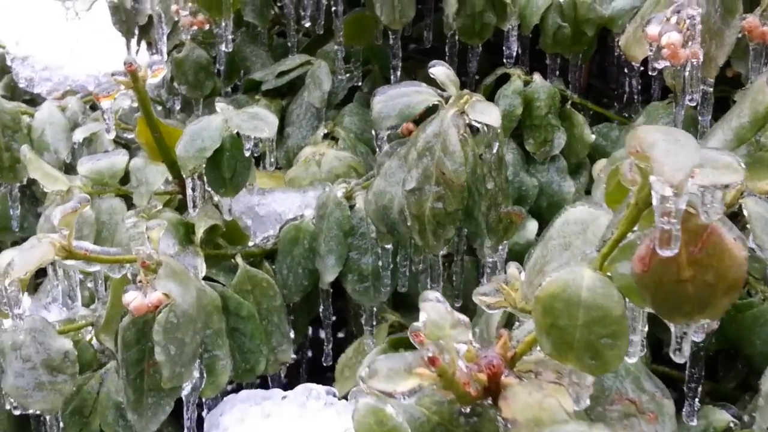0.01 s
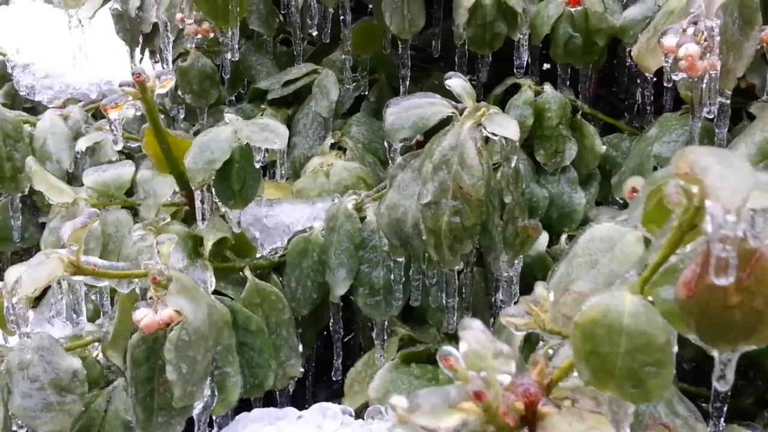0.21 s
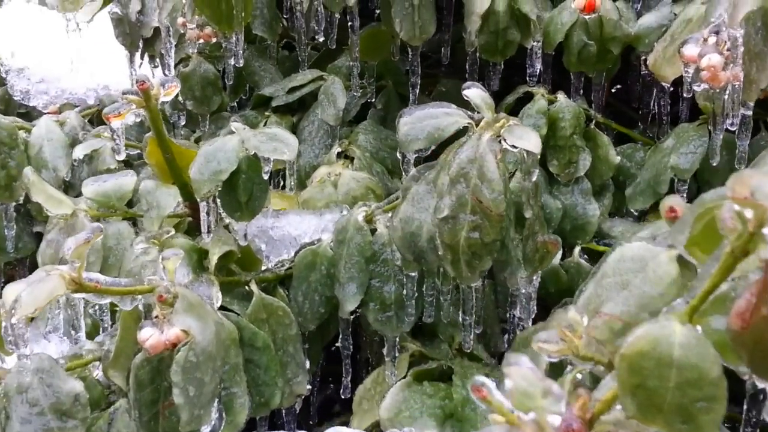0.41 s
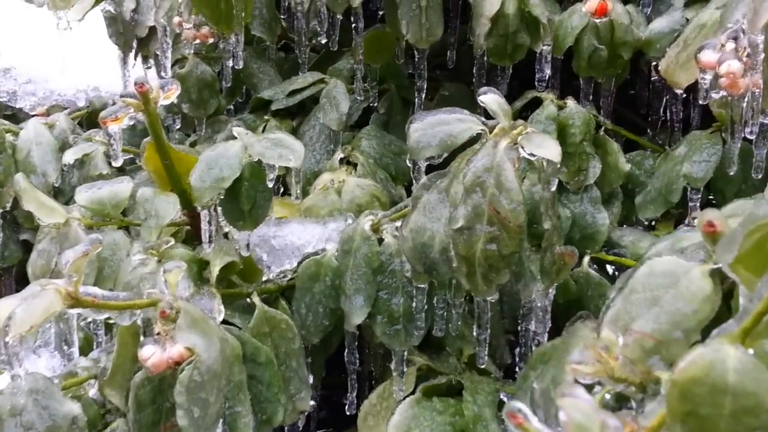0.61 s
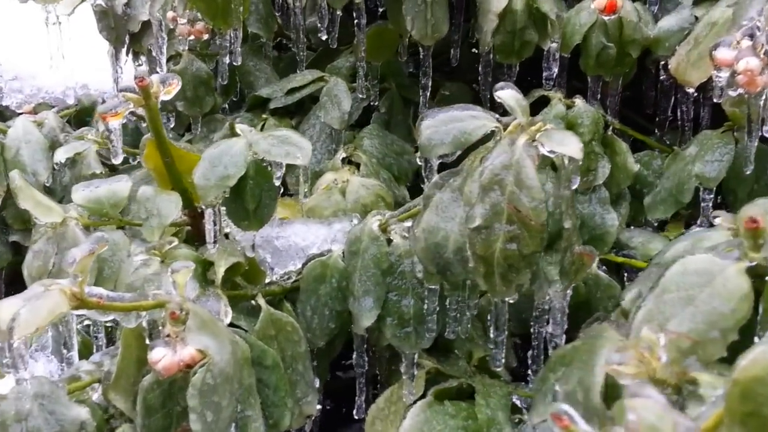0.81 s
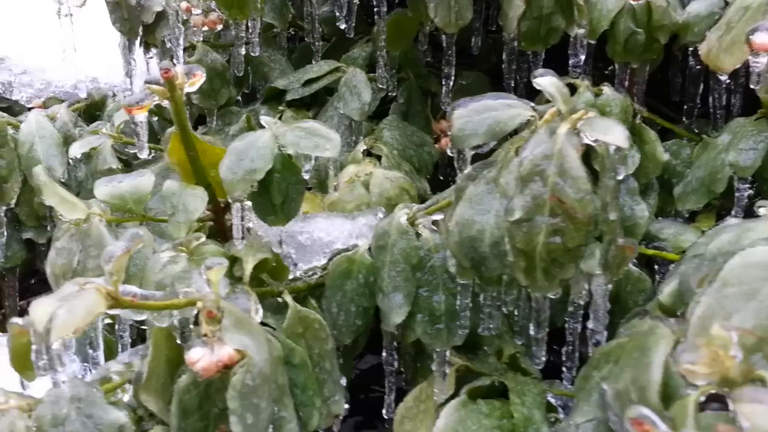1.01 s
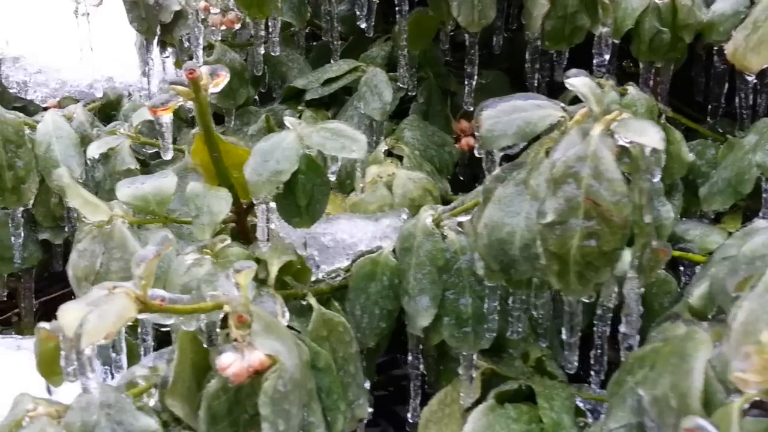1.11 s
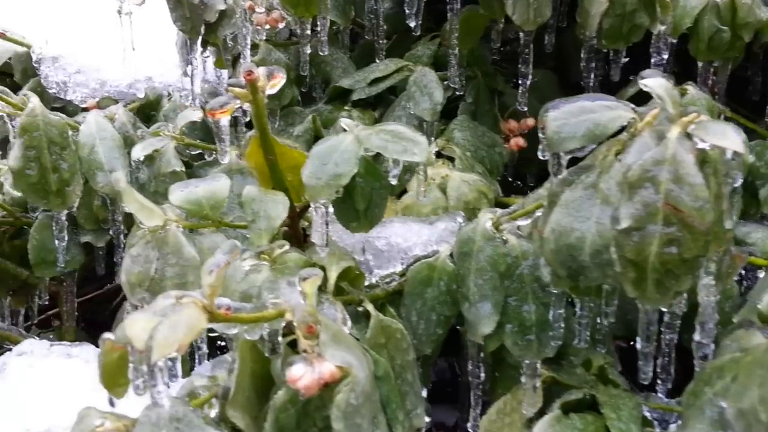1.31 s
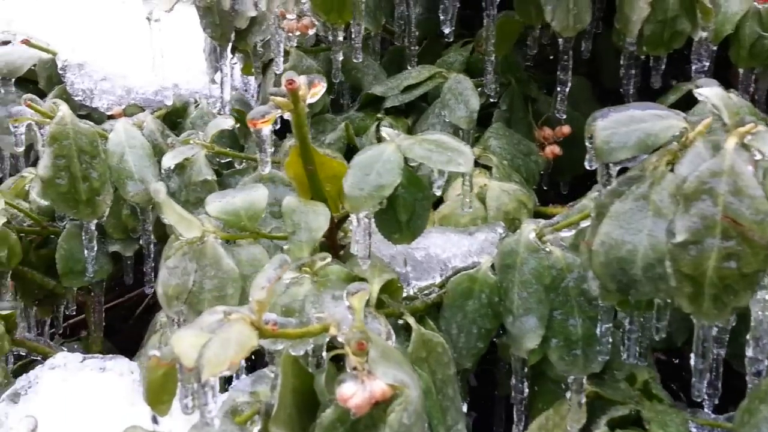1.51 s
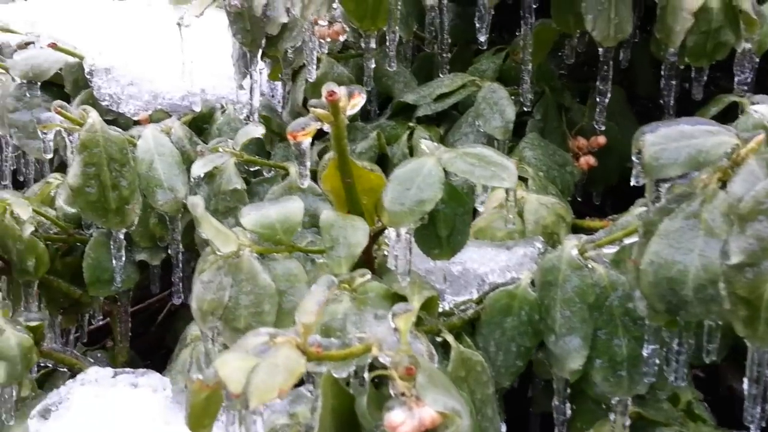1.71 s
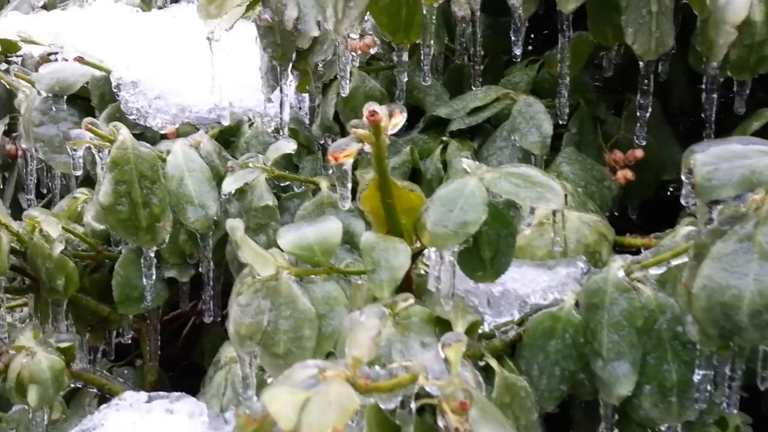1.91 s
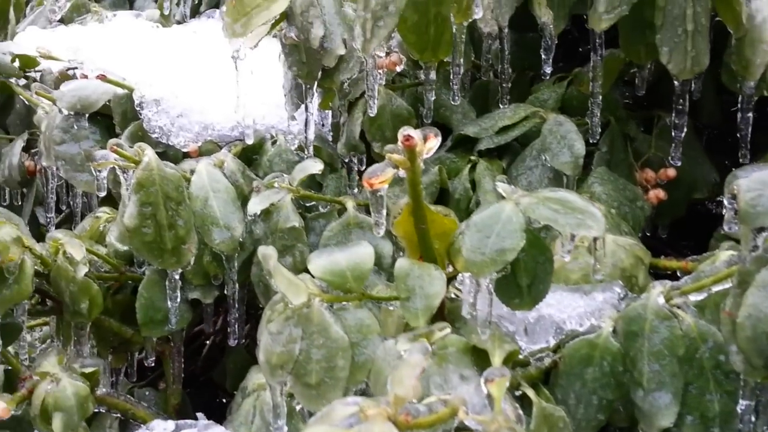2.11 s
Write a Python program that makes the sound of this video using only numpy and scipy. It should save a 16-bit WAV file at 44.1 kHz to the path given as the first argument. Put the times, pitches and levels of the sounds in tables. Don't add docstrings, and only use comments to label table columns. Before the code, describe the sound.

Brittle ice snaps and crumbles with hard dry knocks in the first second, chips patter through iced leaves, another crackling break follows, then faint hiss and low outdoor rumble; close stereo phone microphone, no echo.

```python
import sys
import numpy as np
from scipy import signal
from scipy.fft import rfft, irfft, next_fast_len
from scipy.io import wavfile
from scipy.ndimage import map_coordinates

SR = 44100
rng = np.random.default_rng(int(sys.argv[2]) if len(sys.argv) > 2 else 0)


def generate_wav(sig):
    pcm = np.round(np.clip(np.atleast_2d(sig).T, -1, 1) * 32767).astype(np.int16)
    wavfile.write(sys.argv[1], SR, pcm)


def volts_from_db(level):
    exponent = np.asarray(level, float) / 20
    return 10 ** exponent


N = 97020

PORT_LAG_S = 0.00011
# frequency in Hz, gain in dB.
NEAR_ICE = [(150, -45), (400, -8), (900, -7.5), (2500, -2.5), (5000, -4), (9000, -0.5), (15000, -13)]
# frequency in Hz, gain in dB.
FAR_ICE = [(300, 8.5), (1000, -4), (2500, -2.5), (5000, 0), (9000, -1), (15000, -7.5)]


def unit(x):
    return x / np.sqrt(np.mean(x ** 2) + 1e-20)


def wobble(rate):
    knots = rng.standard_normal(N // 8)
    return map_coordinates(knots, [np.arange(N) * rate / SR])


def coloured(x, points):
    size = 2 * next_fast_len(N // 2 + SR // 8)
    hz, db = np.transpose(points)
    log_hz = np.log(np.fft.rfftfreq(size, 1 / SR) + 1)
    cepstrum = irfft(np.log(volts_from_db(np.interp(log_hz, np.log(hz + 1), db))), size)
    cepstrum[1:size // 2] *= 2
    cepstrum[size // 2 + 1:] = 0
    return irfft(rfft(x, size) * np.exp(rfft(cepstrum)), size)[..., :N]


def ring(x, hz, width_hz):
    f = np.fft.rfftfreq(x.shape[-1], 1 / SR)
    damping = 1j * f * width_hz
    return irfft(rfft(x) * damping / (hz * hz - f * f + damping), x.shape[-1])


def pair(shared, apart=((100, 0), (200, 0))):
    common, left, right = rng.standard_normal((3, N))
    share = np.clip(shared, 0, 1)
    mid = (left + right) / 2
    side = coloured((left - right) / 2, apart)
    late = np.roll(common, round(PORT_LAG_S * SR))
    own = np.array([mid + side, mid - side])
    return np.sqrt(share) * np.array([late, common]) + np.sqrt(1 - share) * own


def gritty(grit_db):
    # frequency in Hz, gain of the
    # difference in dB.
    port_difference = [(700, -2), (2500, 2.5)]
    grains = volts_from_db(grit_db * wobble(760))
    return unit(pair(0.22, port_difference) * grains)


def fractures(rows, colour, shard_db, t60):
    rise_s, scatter_t60_s, shard_q = 0.0015, 0.12, 7
    out = np.zeros((2, N + SR))
    grit = np.tile(gritty(1.25), 2)
    t = np.arange(SR // 5) / SR
    decay = volts_from_db(-60 * t / t60)
    for start, db, scatter_db, hz in rows:
        at = round(start * SR)
        noise = grit[:, at:at + len(t)] * (1 - np.exp(-t / rise_s))
        crack = noise * decay
        crack *= np.linalg.norm(decay) / np.linalg.norm(crack, axis=1, keepdims=True)
        shard = ring(crack[0], hz, hz / shard_q)
        shard *= np.linalg.norm(crack[0]) / np.linalg.norm(shard) / 2
        scatter = noise * volts_from_db(scatter_db - 60 * t / scatter_t60_s)
        ringing = shard + ring(scatter, hz, hz / shard_q)
        out[:, at:at + len(t)] += volts_from_db(db) * (crack + scatter + volts_from_db(shard_db) * ringing)
    return coloured(out[:, :N], colour)


def clean_snaps():
    # start in seconds, crack in dB, scatter after it in dB, shard pitch in Hz.
    breaks = [(.2042, -27, -3, 3530), (.2065, -21, -16, 7500), (.2265, -11.5, -12, 7950),
              (.3275, -13, -21, 2470), (.330, -22, -5.5, 6900), (.3808, -40, -28, 7000),
              (.3933, -12, -8, 2960), (.405, -29, -27, 8000), (.4321, -19, -13, 6000),
              (.4735, -23, -25, 1900), (.5925, -20, -4.5, 4360), (.670, -15, -6, 6900),
              (.6765, -11.5, -7, 4860), (1.3272, -18, 0.5, 6000), (1.3415, -9, -9.5, 6200),
              (1.4895, -24, -12, 5450), (.4948, -15.5, -0.5, 5400), (.5145, -8.5, -15, 4400),
              (.520, -8.5, -24, 2540)]
    return fractures(breaks, NEAR_ICE, shard_db=1, t60=0.0074)


def crumbles():
    # start in seconds, rise in seconds, hold in seconds, level in dB, fade t60 in seconds.
    collapses = [(0.316, 0.0039, .001, -32, 0.017), (0.224, 0.0036, .001, -24, .02),
                 (0.474, 0.0035, 0.0092, -30.5, 0.059), (0.4931, 0.0015, 0.02, -10, 0.081),
                 (0.535, .005, 0.013, -25, 0.17), (0.59, .004, 0.009, -41, 0.059),
                 (0.645, 0.0026, 0.0096, -27.5, 0.13), (0.674, 0.002, 0.0083, -15, 0.062),
                 (0.968, 0.0054, 0.015, -37.5, 0.47), (1.334, 0.0019, 0.033, -14.5, 0.11),
                 (1.44, 0.019, 0.027, -24, 0.072), (1.617, 0.0043, 0.032, -44, 0.099),
                 (1.85, 0.0041, 0.018, -46.5, 0.073), (1.913, 0.01, 0.018, -50, 0.067),
                 (2.021, 0.0029, 0.019, -43, 0.092)]
    t = np.arange(N) / SR
    power = np.zeros(N)
    for start, rise, hold, db, t60 in collapses:
        attack = np.clip((t - start) / rise, 0, 1)
        fading_s = np.maximum(t - start - rise - hold, 0)
        power += (attack * volts_from_db(db - 60 * fading_s / t60)) ** 2
    return coloured(np.sqrt(power) * gritty(2.5), NEAR_ICE)


def splinters():
    # start in seconds, crack in dB, shard pitch in Hz.
    breaks = [(.4955, -20, 6200), (0.5, -20, 6800), (0.503, -19, 7000), (0.508, -32, 6000),
              (0.5112, -24, 8200), (0.511, -18.5, 7060), (0.523, -22, 6500), (0.526, -23, 4950),
              (0.535, -27, 6000), (0.6785, -23, 7000), (0.684, -21, 6500), (0.685, -27, 8600),
              (0.3992, -25, 4450), (0.397, -29, 7000), (.412, -30, 4200), (0.4331, -28, 2720),
              (0.329, -37, 2950), (1.3406, -20, 9500), (1.347, -28, 7500), (1.348, -19, 5300),
              (1.3495, -22, 7660), (1.3515, -12, 5230), (1.3673, -19, 6300), (1.376, -21, 7200),
              (1.384, -26, 6960), (1.4595, -31, 6800), (1.464, -23, 5230), (1.4725, -25, 5240),
              (1.476, -17, 6800), (1.4896, -17, 5500)]
    rows = [(start, db, -40, hz) for start, db, hz in breaks]
    return fractures(rows, NEAR_ICE, shard_db=8, t60=0.0041)


def twigs():
    # start in seconds, peak in dB, pitch in Hz, t60 in seconds.
    knocks = [(0.2044, -37, 1640, 0.015), (.2268, -21.5, 1494, 0.014), (.2272, -9, 344, 0.004),
              (0.3275, -10.5, 1530, 0.01), (.328, -2, 500, 0.0036), (0.3932, 0.5, 442, 0.0066),
              (0.3956, -4.5, 167, 0.014), (.3935, -10.5, 680, .006), (0.4335, -13, 660, 0.0083),
              (0.4318, -16, 1010, 0.0087), (0.4959, -24, 212, 0.089), (1.485, -29.5, 787, 0.025),
              (1.343, -27, 196, 0.051), (1.462, -23.5, 259, 0.022), (1.617, -30.5, 173, 0.015),
              (.4735, -20, 580, 0.0059), (.5475, -25.5, 690, 0.013), (.5545, -25, 855, 0.0098),
              (.598, -39.5, 700, 0.04), (.6482, -31, 676, 0.018), (.6555, -17.5, 840, 0.0037),
              (1.151, -41, 1450, 0.0074), (1.2012, -27.5, 720, 0.0098), (1.770, -38, 234, 0.027),
              (.55, -30, 100, 0.078), (1.36, -29, 115, 0.079), (1.772, -37, 95, 0.088),
              (2.155, -32.5, 142, 0.03)]
    # start in seconds, peak in dB, pitch in Hz.
    rattles = [(0.3922, -15, 1660), (.4956, -21, 890), (.4968, -11, 680), (0.5006, -8.5, 1280),
               (0.5018, -10, 875), (0.5041, -7, 800), (0.5058, -18.5, 780), (0.506, -18, 384),
               (0.5075, -11, 756), (0.5089, -13, 854), (.511, -12, 1160), (.5122, -16.5, 590),
               (0.5134, -7, 2470), (.5142, -8, 826), (.516, -38, 860), (0.5197, -15.5, 825),
               (.5245, -29, 1510), (.670, -15.5, 780), (0.6763, -13, 805), (.678, -16, 785),
               (0.6813, -13.5, 864), (0.6813, -14, 2820), (.677, -15, 2800), (0.6861, -22.5, 670),
               (0.6877, -8, 2800), (.689, -41, 920), (1.3273, -23, 930), (1.3275, -12, 1600),
               (1.3377, -13.5, 830), (1.3273, -12.5, 2880), (1.342, -25, 544), (1.346, -17, 680),
               (1.349, -22, 557), (1.3522, -16, 713), (1.359, -13, 715), (1.3624, -13.5, 1320),
               (1.364, -25, 1260), (1.37, -27, 635), (1.376, -22, 775), (1.447, -29, 620),
               (1.4545, -30, 1400), (1.4595, -22, 626), (1.464, -31, 710), (1.467, -27, 840),
               (1.4713, -21, 580), (1.476, -31, 490), (1.4875, -31, 1100)]
    # frequency in Hz, gain in dB.
    radiation = [(50, -22), (170, -1)]
    rise_cycles, rattle_cycles = 0.34, 8.46
    overtone_ratio, overtone_db = 2.415, -5.5
    length = SR // 10
    t = np.maximum(np.arange(length) / SR - np.array([[PORT_LAG_S], [0]]), 0)
    out = np.zeros((2, N + SR))
    for start, db, hz, t60 in [*knocks, *((s, db, hz, rattle_cycles / hz) for s, db, hz in rattles)]:
        at = round(start * SR)
        decay_db = -60 * t / t60
        tone = np.sin(2 * np.pi * hz * t)
        tone += volts_from_db(overtone_db + decay_db) * np.sin(2 * np.pi * overtone_ratio * hz * t)
        onset = 1 - np.exp(-t * hz / rise_cycles)
        out[:, at:at + length] += volts_from_db(db + 5 + decay_db) * onset * tone
    return coloured(out[:, :N], radiation)


def falling_chips():
    # start in seconds, crack in dB, shard pitch in Hz.
    strikes = [(0.1238, -39, 7250), (0.123, -39.5, 2600), (0.1773, -41, 5240), (.192, -34, 8650),
               (.808, -30.5, 7100), (0.853, -40.5, 4800), (0.896, -34.5, 5470), (.879, -39, 5230),
               (.919, -41, 5040), (0.961, -37, 5530), (0.972, -30, 10300), (.973, -42, 5200),
               (0.994, -30, 9000), (1.04, -38.5, 5000), (1.097, -43, 4670), (0.993, -34, 5100),
               (1.068, -33, 5400), (1.072, -34, 6900), (1.1133, -32.5, 5200), (1.1517, -30.5, 5300),
               (1.181, -34, 5300), (1.1998, -27, 7200), (1.201, -26, 3600), (1.4925, -19.5, 5240),
               (1.246, -36.5, 4260), (1.422, -32, 6070), (1.547, -42.5, 3500), (1.585, -35, 7040),
               (1.622, -37, 7000), (1.864, -42.5, 6500), (2.035, -44, 4430)]
    rows = [(start, db - 6.5, -11.5, hz) for start, db, hz in strikes]
    return fractures(rows, FAR_ICE, shard_db=17, t60=0.0034)


def shaking_db():
    # time in seconds, level in dB.
    shaking = [(0, -77), (0.109, -58), (.13, -48), (.3, -50), (.5, -38), (.75, -46.5), (.85, -47),
               (1.0, -50.5), (1.3, -47), (1.55, -46), (1.682, -60), (2.2, -57)]
    s, db = np.transpose(shaking)
    return np.interp(np.arange(N) / SR, s, db)


def patter():
    level_db = shaking_db() + 1.76 * wobble(25.22) + 1.0 * wobble(59.7)
    return volts_from_db(level_db) * unit(coloured(gritty(-1), FAR_ICE))


def hiss():
    air = volts_from_db(-56.5) * unit(coloured(pair(0.09), FAR_ICE))
    whine = ring(rng.standard_normal(N), hz=4047, width_hz=33)
    air[0] += volts_from_db(-66.5) * unit(whine)
    return air


def rumble():
    # frequency in Hz, density in dB per Hz.
    spectrum = [(24, -27), (34, -14), (50, 1), (110, 3), (200, -6), (316, -10.5), (400, -14), (1500, -28.5),
                (3300, -49)]
    # frequency in Hz, gain in dB.
    left_bass = [(90, -4), (220, 0)]
    shaking = shaking_db()
    swell_db = 0.13 * (shaking - shaking[-1]) + 3.5 * wobble(9.61)
    low = unit(coloured(pair(0.99), spectrum)) * volts_from_db(-51.5 + swell_db)
    return np.array([coloured(low[0], left_bass), low[1]])


def scene():
    near = clean_snaps() + crumbles() + splinters() + twigs()
    return near + falling_chips() + patter() + hiss() + rumble()


def roll_off(x):
    return signal.sosfilt(signal.butter(12, 15820, fs=SR, output="sos"), x)


def record(dry):
    # frequency in Hz, gain in dB.
    left_port = [(900, 0.52), (1500, 3.8), (2200, 0.5), (3400, 4), (4300, 6.5), (5800, 2), (7500, -6.5),
                 (10400, -3), (11800, -9.5), (14000, -23)]
    # frequency in Hz, gain in dB.
    right_port = [(900, 0.8), (1500, 1.7), (2200, 1.5), (4200, -3), (5600, -0.5), (6900, 8), (8000, 0.5),
                  (9500, -2), (11500, -1.5), (14000, -1)]
    ceiling, top_hz = 0.95, 14720
    x = np.array([coloured(dry[0], left_port), coloured(dry[1], right_port)])
    x = x + volts_from_db(-66) * rng.standard_normal((2, N))
    x = x / (1 + np.abs(x / ceiling) ** 6) ** (1 / 6)
    band_limit = 1 + (np.fft.rfftfreq(N, 1 / SR) / top_hz) ** 90
    x = irfft(rfft(x) / band_limit, N)
    return roll_off(x)


dry = scene()
out = record(dry)
generate_wav(out)
```